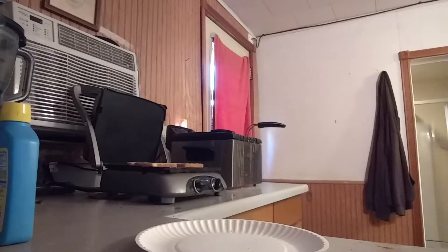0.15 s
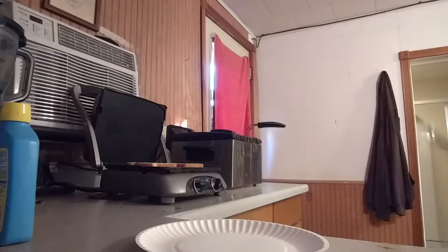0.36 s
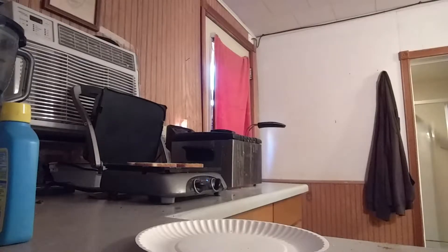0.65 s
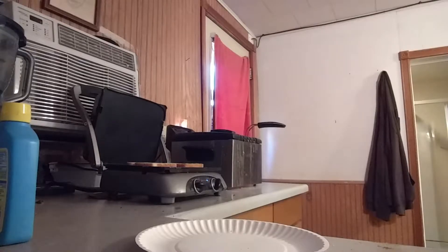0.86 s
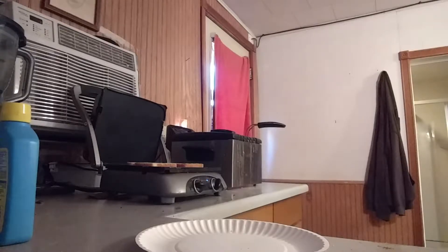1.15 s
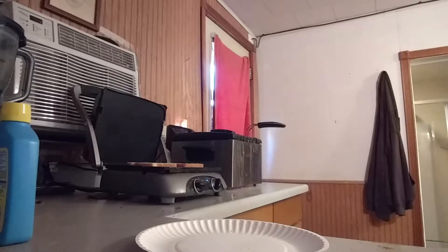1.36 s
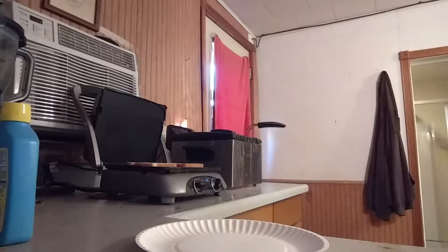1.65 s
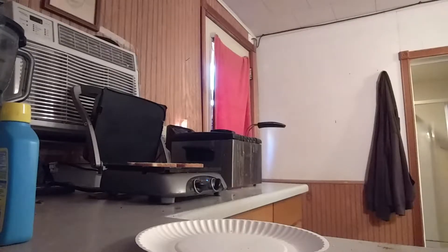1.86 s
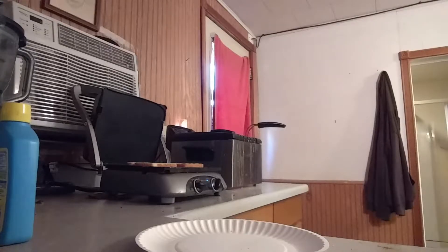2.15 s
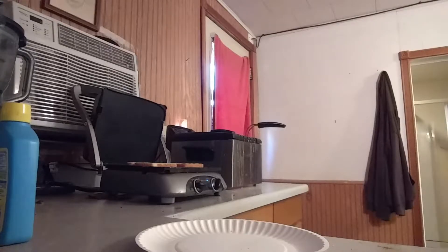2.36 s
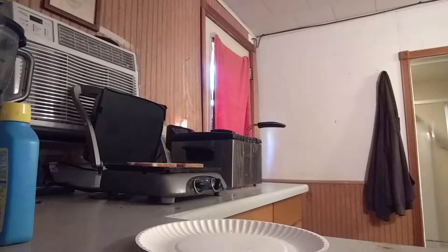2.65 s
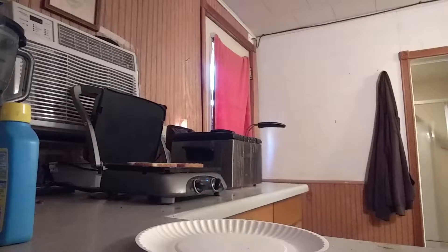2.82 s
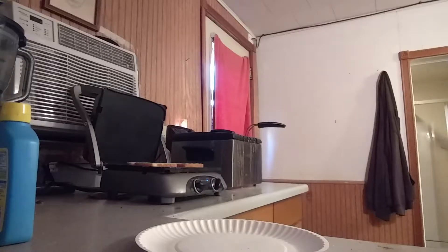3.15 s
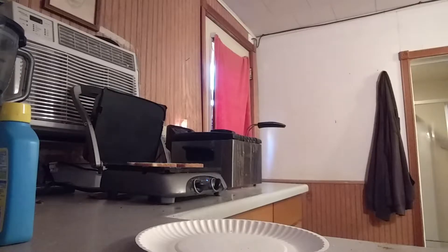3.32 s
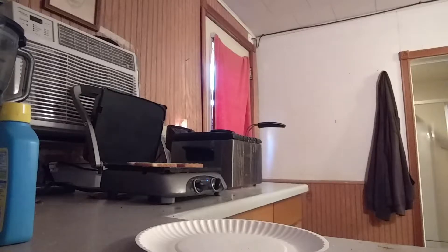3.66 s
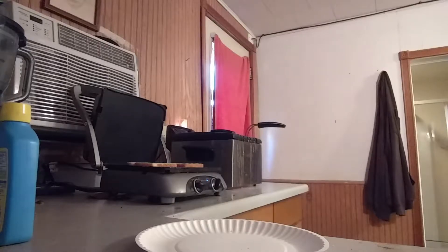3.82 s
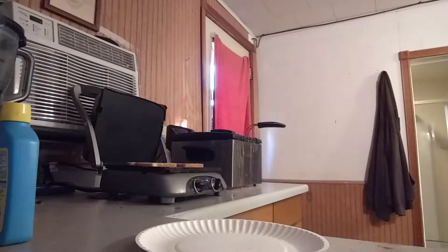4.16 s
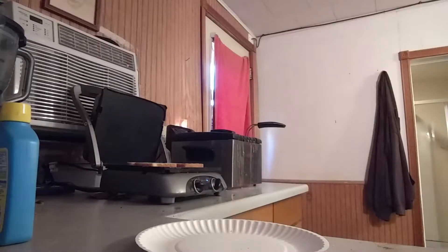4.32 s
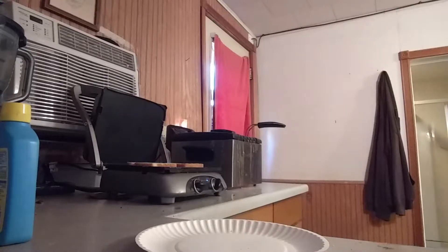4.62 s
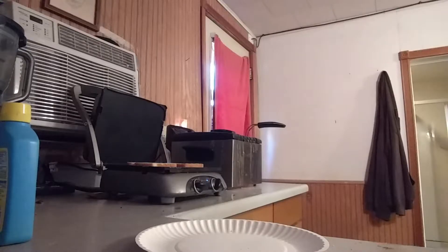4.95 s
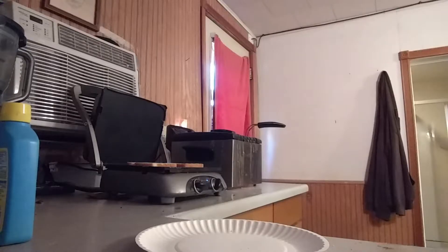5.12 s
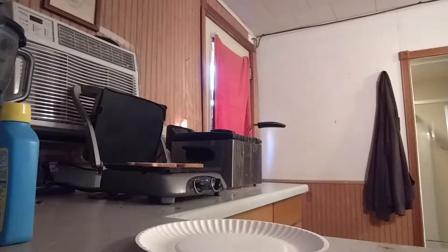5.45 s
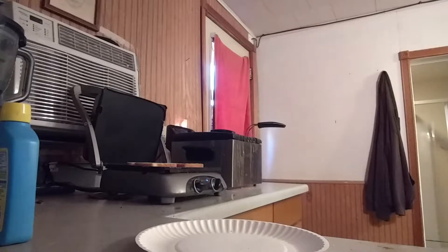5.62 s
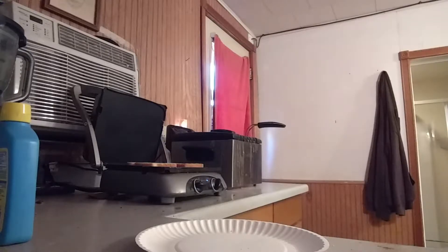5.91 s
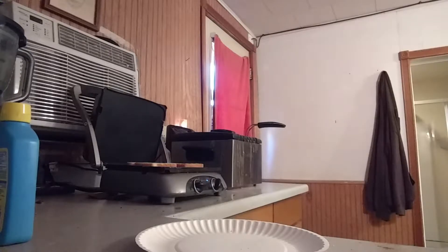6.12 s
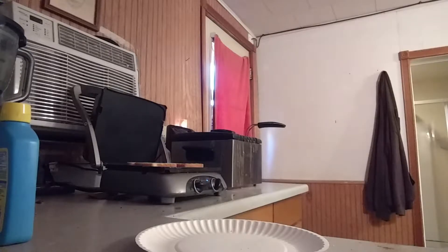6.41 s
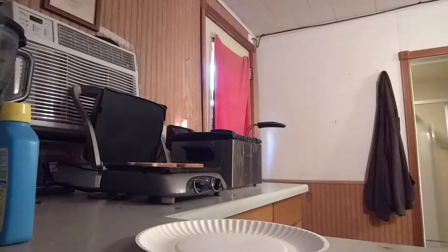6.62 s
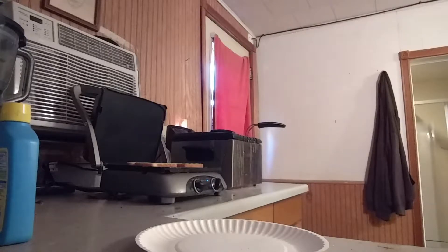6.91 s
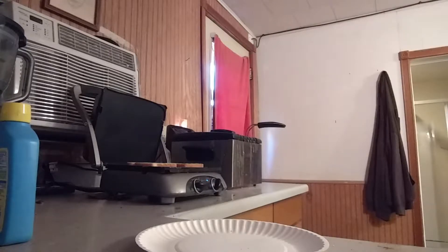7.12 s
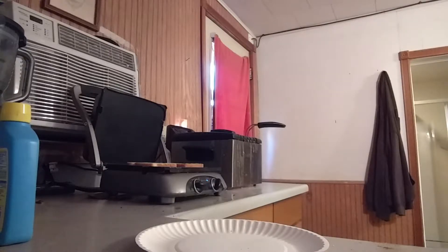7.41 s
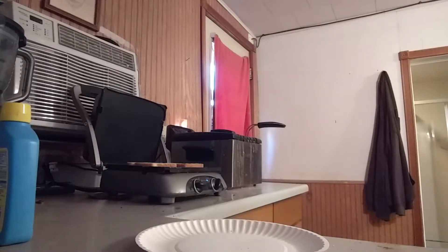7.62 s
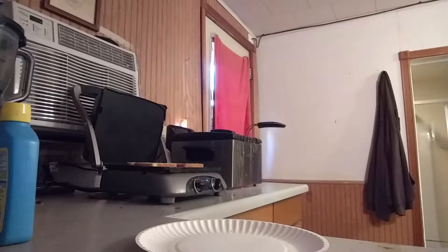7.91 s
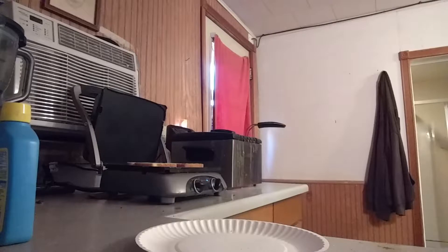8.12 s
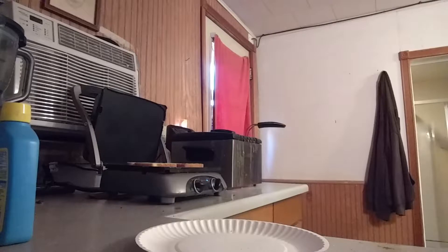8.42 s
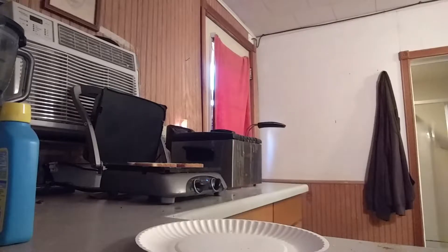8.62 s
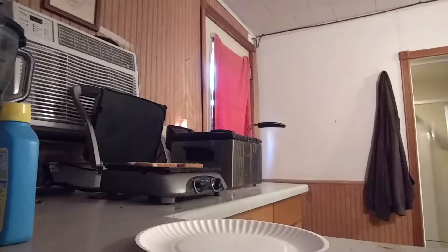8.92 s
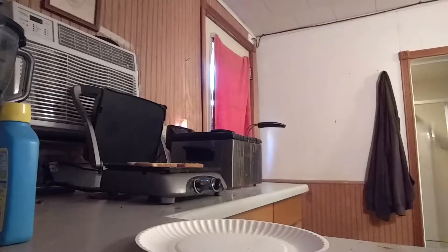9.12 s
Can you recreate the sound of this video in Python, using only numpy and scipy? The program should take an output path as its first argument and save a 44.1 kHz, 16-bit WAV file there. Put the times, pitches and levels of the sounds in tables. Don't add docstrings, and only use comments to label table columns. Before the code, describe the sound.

A window air conditioner runs without a break for a little over nine seconds in a small kitchen, heard from a phone on the counter about a metre away. A boxy, fluttering blower roar in the low mids blends with soft grille hiss, faint mains hum and a clear steady blade drone near 445 Hz. Water droplets patter finely all along, with sharper bright ticks around 0.1, 0.6, 1.4, 1.9, 3.4, 3.9, 5.3 and 6.2 s, and slightly longer spits clustered near 1-1.6 and 5-6 s. Dull short panel thuds come irregularly, stronger near 0.9, 3.8, 5.0, 6.9, 7.7 and 8.0 s. Lighter louvre knocks sound around 3.5, 5.0, 6.5, 7.7 and 8.0 s. Level dips slightly after some peaks; the room is small and short, the stereo uneven. It continues unchanged to the end.

```python
import sys
import numpy as np
from scipy import signal
from scipy.fft import rfft, irfft, next_fast_len
from scipy.io import wavfile
from scipy.ndimage import uniform_filter1d

SR = 44100
rng = np.random.default_rng(int(sys.argv[2]) if len(sys.argv) > 2 else 0)


def store_wav(level_fs):
    pcm = np.round(np.clip(np.atleast_2d(level_fs), -1, 1) * 32767)
    wavfile.write(sys.argv[1], SR, pcm.T.astype(np.int16))


def how_loud(loudness_db):
    steps = np.asarray(loudness_db, float) / 20
    return 10 ** steps


N = 408807
T = np.arange(N) / SR
M = next_fast_len(N)
HZ = np.maximum(np.fft.rfftfreq(M, 1 / SR), 1)


def over_hz(table):
    hz, value = np.transpose(table)
    return np.interp(np.log(HZ), np.log(hz), value)


def walk(rate_hz):
    hold = int(SR / rate_hz)
    level = np.repeat(rng.standard_normal(N // hold + 1), hold)
    level = uniform_filter1d(uniform_filter1d(level, hold), hold)[:N]
    level = level - uniform_filter1d(level, 5 * hold)
    return level / level.std()


def turbulence(shape, shared_db, own_db, rate_hz):
    noise = rfft(rng.standard_normal((2, M))) * how_loud(over_hz(shape)) * np.sqrt(SR / 2)
    noise = noise.astype(np.complex64)
    swell = walk(rate_hz)
    low_hz, high_hz = shape[0][0], shape[-1][0]
    half_octave = 2 * np.log2(np.clip(HZ / low_hz, 1, None))
    out = 0
    for k in range(int(2 * np.log2(high_hz / low_hz)) + 2):
        window = np.clip(1 - abs(half_octave - k), 0, 1).astype(np.float32)
        band = irfft(noise * window, M)[:, :N]
        out = out + band * how_loud(shared_db * swell + own_db * walk(1.5 * rate_hz))
    return rfft(out, M)


# hz, level_db (per Hz)
ROAR_SPECTRUM = [(20, -95), (50, -85.5), (95, -78), (130, -67), (160, -63), (215, -58.5), (270, -56),
                 (340, -56.5), (460, -57.5), (510, -62), (700, -62), (1130, -63), (1190, -70), (2100, -75)]
# hz, level_db (per Hz)
HISS_SPECTRUM = [(900, -87), (1600, -73.5), (2100, -76.5), (2600, -68), (3300, -67), (4000, -68.5),
                 (5100, -69), (6500, -71), (8000, -69), (9500, -71.5), (12000, -74.5), (14500, -76.5),
                 (15700, -83.5)]


def airflow():
    roar = turbulence(ROAR_SPECTRUM, shared_db=0.65, own_db=1.5, rate_hz=14)
    hiss = turbulence(HISS_SPECTRUM, shared_db=-0.1, own_db=0.62, rate_hz=26)
    return roar + hiss


# centre_hz, width_hz, left_db, right_db
RESONANCES = [(188, 25, 10.5, 10.5), (213, 12, -4, -4), (288, 30, 0, -8), (372, 25, 3, 3), (424, 40, 9, 8),
              (468, 16, 3, 4), (497, 25, -2, -2), (550, 40, -2, -4), (655, 40, 2, 3), (704, 18, 5, 3),
              (735, 25, -7, -5), (787, 24, 8, 8), (840, 28, 5, 4), (920, 50, 0, -5), (985, 50, 3, 2),
              (1028, 20, -6, -5), (1120, 30, 7, 7), (1232, 25, -5, -4), (1258, 22, 6, 3), (1403, 28, 4, 6),
              (1435, 20, -4, -1), (1780, 50, 4, 2), (2250, 150, 3, 3), (3870, 200, 0, 5), (5340, 300, 0, 3),
              (6100, 300, 0, 2), (7250, 500, 0, 3), (8150, 300, 2, 3), (12300, 600, -1, -2)]


def casing_gains():
    left_db, right_db = 0, 0
    for centre_hz, width_hz, mode_left_db, mode_right_db in RESONANCES:
        curve = 1 / (1 + (2 * (HZ - centre_hz) / width_hz) ** 2)
        left_db = left_db + mode_left_db * curve
        right_db = right_db + mode_right_db * curve
    return how_loud(left_db), how_loud(right_db)


# pitch_hz, level_db (rms)
MOTOR_TONES = [
    (44.5, -72),
    (119.95, -52.5),
    (164.44, -53),
    (444.96, -41),
]


def hum():
    out = np.zeros(N)
    for pitch_hz, level_db in MOTOR_TONES:
        phase = 2 * np.pi * pitch_hz * T + 0.27 * walk(1.69)
        out += how_loud(level_db) * np.sqrt(2) * np.sin(phase)
    return out


def each(table, value):
    return np.c_[table, np.full(len(table), value)]


def scatter(count):
    start, size, pitch, length = rng.random((count, 4)).T
    return start * N / SR, np.log(size + 1e-3), pitch, length


def ring(table, lift_db):
    out = np.zeros(N)
    for start_s, level_db, pitch_hz, cycles in table:
        u = np.arange(int(3 * cycles * SR / pitch_hz)) * pitch_hz / SR / cycles
        envelope = (3.42 * u * np.exp(1 - 3.45 * u)) ** 2
        blow = how_loud(level_db + lift_db) * envelope * np.sin(2 * np.pi * cycles * u)
        start = int(start_s * SR)
        out[start:][:len(u)] += blow[:N - start]
    return out


def buffeting():
    start_s, size, pitch, length = scatter(count=260)
    return ring(np.c_[start_s, 4 * size, 330 * 4 ** pitch, 3 + 4 * length], lift_db=-26.0)


def spray(table):
    out = np.zeros(N)
    for start_s, level_db, centre_hz, length_s in table:
        t = np.arange(2048) / SR
        burst = rng.standard_normal(2048) * t ** 2 * np.exp(-t / max(length_s * 0.14, 1e-4))
        edges_hz = [centre_hz / 1.61, min(centre_hz * 1.28, 18000)]
        burst = signal.lfilter(*signal.butter(2, edges_hz, "band", fs=SR), burst)
        burst = how_loud(level_db + 6.5) * burst / abs(burst).max()
        start = int(start_s * SR)
        out[start:][:2048] += burst[:N - start]
    return out


def patter():
    start_s, size, pitch, _ = scatter(count=300)
    return spray(each(np.c_[start_s, -26.5 + 3.5 * size, 3000 * 3.5 ** pitch], 0.014))


# start_s, level_db (peak), centre_hz
FIN_TICKS = [(0.107, -22, 5740), (0.632, -19, 7010), (1.3773, -18, 6040), (1.4441, -21, 7950),
             (1.938, -23, 8010), (3.4306, -21, 8270), (3.907, -19, 8200), (4.6518, -25, 5680),
             (5.28, -22, 6760), (6.206, -24, 6660), (7.437, -26, 8140), (7.808, -22, 6400)]


def ticks():
    return spray(each(FIN_TICKS, 0.0032))


# start_s, level_db (peak), centre_hz
WATER_SPITS = [(0.187, -29, 3930), (0.5916, -26, 3600), (1.055, -22.5, 3700), (1.188, -22, 5960),
               (1.601, -22, 3250), (1.9395, -28, 3830), (2.6269, -31, 3690), (4.4253, -26, 8100),
               (4.655, -29, 5680), (4.9901, -25, 3250), (5.035, -27, 8240), (5.166, -27, 3230),
               (5.216, -26, 8190), (5.277, -26, 6700), (5.421, -28, 3260), (5.562, -23, 3550),
               (5.924, -26, 7430), (6.211, -26, 6600), (6.611, -23, 3240), (7.156, -24, 5360),
               (7.89, -29, 6020), (8.844, -27, 3350), (8.9865, -24.5, 6130)]


def spits():
    return spray(each(WATER_SPITS, 0.019))


# start_s, level_db (peak), pitch_hz
PANEL_THUDS = [(0.331, -15, 420), (0.92, -8, 400), (1.141, -16, 350), (1.169, -15.5, 425),
               (1.229, -16, 390), (1.593, -13, 440), (1.641, -12, 420), (1.941, -13.5, 448),
               (2.551, -13, 420), (2.595, -14, 407), (2.977, -12, 415), (3.356, -13.5, 374),
               (3.794, -15, 388), (3.819, -10.5, 415), (4.931, -13, 420), (5.006, -9, 404),
               (5.61, -12, 432), (5.74, -13.5, 386), (5.977, -12.5, 426), (6.485, -13.5, 417),
               (6.577, -13, 444), (6.638, -13, 438), (6.9, -9.5, 430), (7.134, -12.5, 390),
               (7.433, -12, 413), (7.738, -7.5, 410), (8.003, -10, 415), (8.166, -11, 365),
               (8.379, -14, 408), (9.15, -11, 420)]


def thuds():
    cycles, mode_hz, spread_hz = 5.46, 404, 43
    start_s, size, pitch, length = scatter(count=28)
    pitch_hz = mode_hz + spread_hz * (2 * pitch - 1)
    weak = np.c_[start_s, -17.5 + 3 * size, pitch_hz, cycles + length - .5]
    return ring([*each(PANEL_THUDS, cycles), *weak], lift_db=-3.1)


# start_s, level_db (peak), pitch_hz
LOUVRE_KNOCKS = [(0.383, -18, 840), (0.918, -17.5, 1010), (1.043, -19, 855), (1.141, -17, 860),
                 (1.427, -23, 1120), (1.641, -17, 985), (2.59, -17, 990), (2.889, -22, 1130),
                 (3.505, -14, 996), (4.209, -17.5, 840), (4.341, -20, 1120), (4.609, -16.5, 1060),
                 (4.989, -15, 955), (5.621, -18, 1130), (6.339, -18, 805), (6.49, -16, 950),
                 (7.192, -18, 1050), (7.566, -17.5, 790), (7.726, -14, 860), (8.039, -15, 999),
                 (8.969, -22, 790)]
LOUVRE_MODES = [790, 850, 960, 1120]


def knocks():
    cycles = 6.7
    start_s, size, pitch, length = scatter(count=15)
    pitch_hz = np.array(LOUVRE_MODES)[(pitch * len(LOUVRE_MODES)).astype(int)]
    weak = np.c_[start_s, -23 + 3 * size, pitch_hz, cycles + 2 * length]
    return ring([*each(LOUVRE_KNOCKS, cycles), *weak], lift_db=-3.5)


def room(wet_db, t60_s):
    t = np.arange(SR // 2) / SR
    tail = rng.standard_normal((2, len(t))) * how_loud(-60 * t / t60_s) * (t > .002)
    tail = tail / np.sqrt((tail ** 2).sum(axis=1, keepdims=True))
    return rfft(tail, M) * how_loud(wet_db)


def two_paths():
    comb_hz, skew = 1165, .4
    turn = np.pi * np.maximum(HZ / comb_hz, 1)
    paths = -np.cos(turn) - 1j * skew * np.sin(turn)
    return paths / np.sqrt(abs(paths))


# hz, likeness (0-1)
PORT_LIKENESS = [(20, .5), (45, .85), (120, .95), (1200, .93), (2300, .75), (4600, .8), (5800, .7),
                 (8150, .72), (9300, .52), (15500, .3)]


def far_air(air, paths):
    like = over_hz(PORT_LIKENESS) * paths
    return like * air[0] + np.sqrt(1 - abs(like) ** 2) * air[1]


# hz, left_minus_right_db
PORT_BALANCE = [(60, -.5), (125, 0), (180, 4), (450, 5), (750, 1), (1200, -.6), (3600, -.8), (4600, -1),
                (5300, -5), (7500, -5), (10000, -1.5), (12000, -2), (14000, -6), (15400, -10)]
# hz, left_lead_turns
PORT_LEAD = [(20, .49), (65, .39), (120, .29), (190, .2), (290, .29), (345, .13), (650, .08), (1000, .02),
             (1500, .06), (2600, 0), (4800, -.02), (5600, .12), (8200, .19), (11000, .28), (15500, .35)]


def far_port(spectrum):
    return spectrum * how_loud(-over_hz(PORT_BALANCE)) * np.exp(-2j * np.pi * over_hz(PORT_LEAD))


def scene():
    air = airflow()
    left_gain, right_gain = casing_gains()
    tones = rfft(hum(), M)
    blows = rfft(buffeting() + patter() + ticks() + spits() + thuds() + knocks(), M)
    blows = blows / (1 + (149 / HZ) ** 4) * (1 + room(wet_db=-1.0, t60_s=.14))
    ripple = 1 + room(wet_db=-11, t60_s=.1) / (1 + (1500 / HZ) ** 6)
    paths = two_paths()
    left = air[0] * left_gain * ripple[0] + blows[0] + tones
    right = far_air(air, paths) * right_gain * ripple[1] + blows[1] * paths + tones
    return irfft(np.array([left, far_port(right)]), M)[:, :N]


# start_s, dip_db
GAIN_DIPS = [
    (0.113, -5),
    (1.448, -1.5),
    (1.95, -0.5),
    (3.36, -0.5),
    (3.91, -2),
    (5.282, -2),
    (6.212, -4.5),
    (7.0, -1),
    (7.445, 0.5),
    (8.175, -2.5),
]


def gain_control():
    release_s = 0.22
    dip_db = np.zeros(N)
    for start_s, depth_db in GAIN_DIPS:
        dip_db += depth_db * (T > start_s) * np.exp(-np.maximum(T - start_s, 0) / release_s)
    return how_loud(uniform_filter1d(dip_db, size=200))


def gaps(x, holes, faint_db=-200):
    hz, frames, z = signal.stft(x, SR, nperseg=2048)
    hz = hz[:, None]
    for low_hz, high_hz, share in holes:
        chance = rng.standard_normal((3, len(frames)))
        gone, low, high = uniform_filter1d(chance, size=2) * np.sqrt(2)
        inside = (hz > low_hz + 30 * low) & (hz < high_hz + 8 * high)
        z = z * ~(inside & (gone <= np.quantile(gone, share)))
    faint = uniform_filter1d(abs(z), size=3, axis=0) < how_loud(faint_db)
    return signal.istft(z * ~(faint & (hz > 9000)), SR)[1][:N]


# low_hz, high_hz, share of frames (0-1)
LEFT_GAPS = [(14550, 14900, .45), (14900, 15300, .3), (15250, 16000, .8), (15500, 23000, 1)]
# low_hz, high_hz, share of frames (0-1)
RIGHT_GAPS = [(15200, 15600, .3), (15500, 23000, 1)]


def channel_gaps(left, right):
    return gaps(left, LEFT_GAPS, faint_db=-66), gaps(right, RIGHT_GAPS, faint_db=-63.5)


# low_hz, high_hz, share of frames (0-1)
MID_GAPS = [(2060, 2550, 1), (1970, 2100, .25), (4290, 4500, .42), (4420, 4620, .45), (4550, 4780, .33),
            (4700, 4950, .2), (10850, 10980, .2), (11200, 11320, .15), (11900, 12050, .15),
            (12300, 12450, .2), (12500, 12650, .15)]
# low_hz, high_hz, share of frames (0-1)
SIDE_GAPS = [(3200, 3760, .9), (3120, 3300, .5), (1060, 1230, .5), (960, 1100, .35)]


def stereo_gaps(left, right):
    mid = gaps(left + right, MID_GAPS) / 2
    side = gaps(left - right, SIDE_GAPS) / 2
    return np.array([mid + side, mid - side])


def low_pass(x):
    return signal.sosfilt(signal.butter(12, 16250, fs=SR, output="sos"), x)


def record(dry):
    gain = gain_control()
    left, right = channel_gaps(dry[0], dry[1])
    mix = stereo_gaps(gain * left, gain * right)
    return low_pass(mix)


dry = scene()
out = record(dry)
store_wav(out)
```